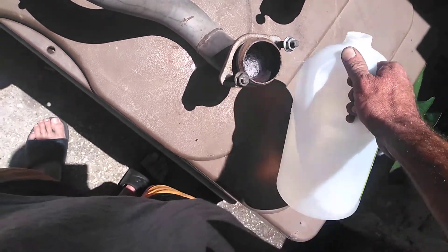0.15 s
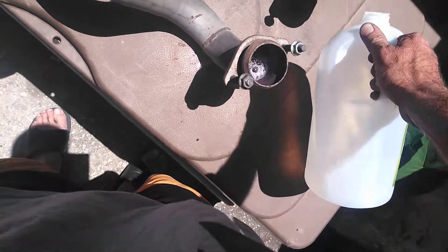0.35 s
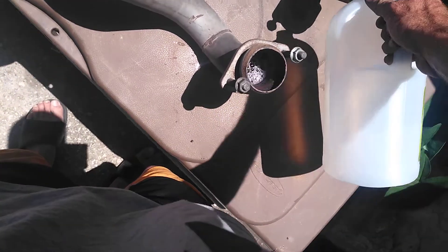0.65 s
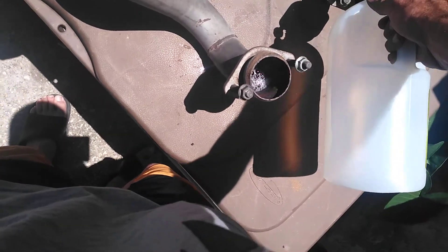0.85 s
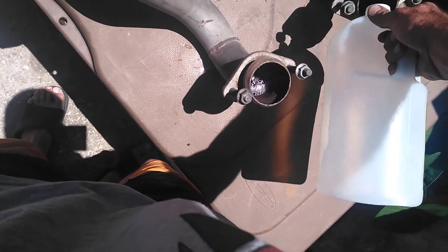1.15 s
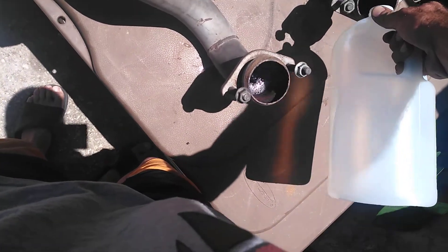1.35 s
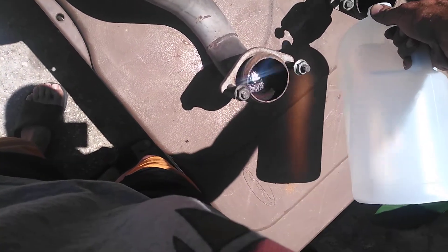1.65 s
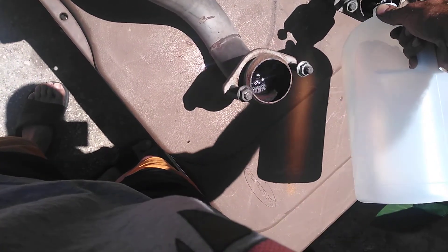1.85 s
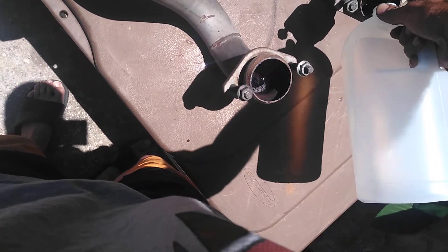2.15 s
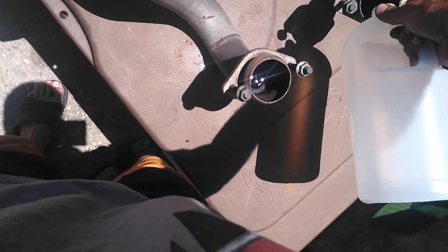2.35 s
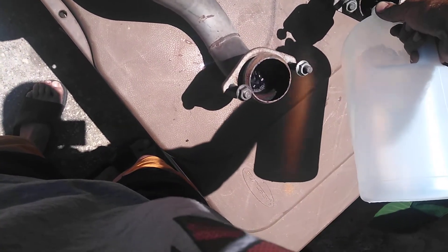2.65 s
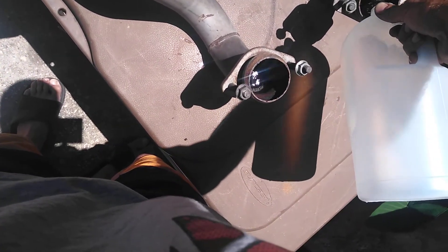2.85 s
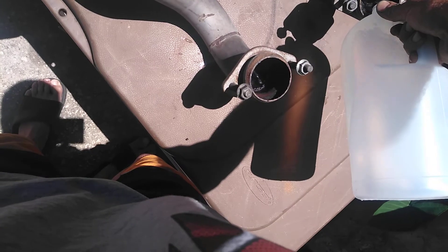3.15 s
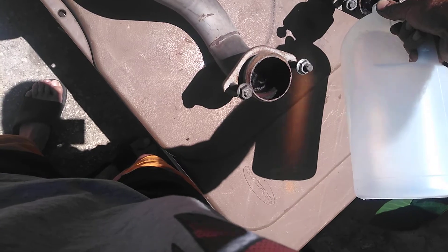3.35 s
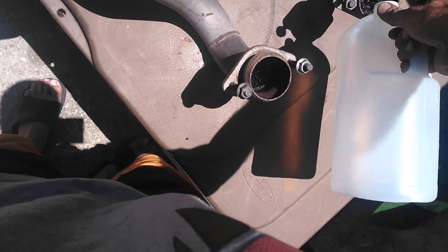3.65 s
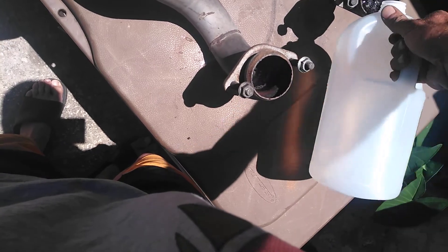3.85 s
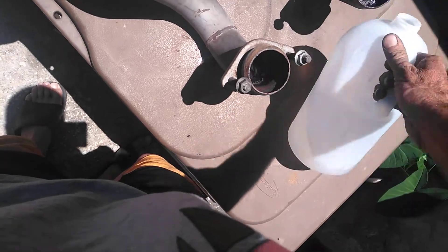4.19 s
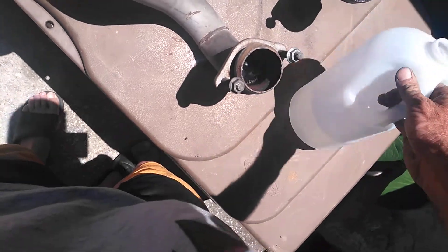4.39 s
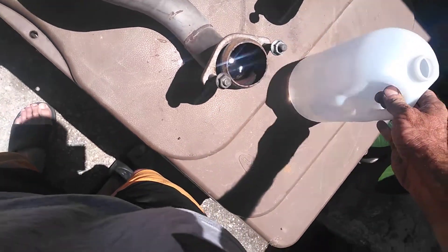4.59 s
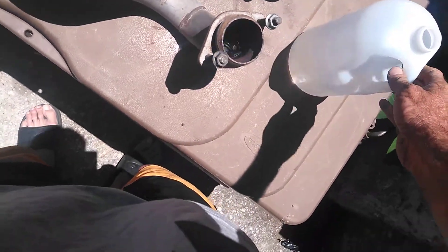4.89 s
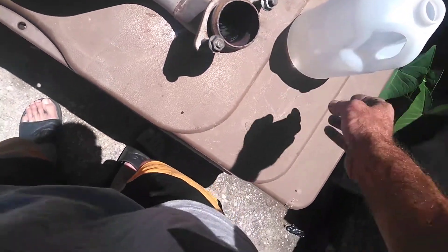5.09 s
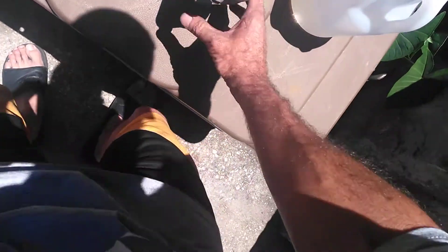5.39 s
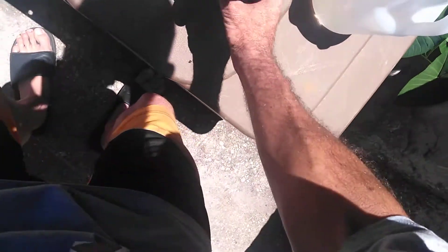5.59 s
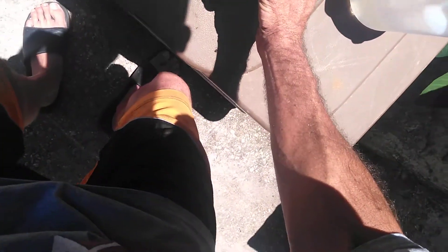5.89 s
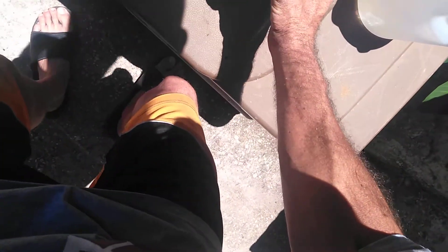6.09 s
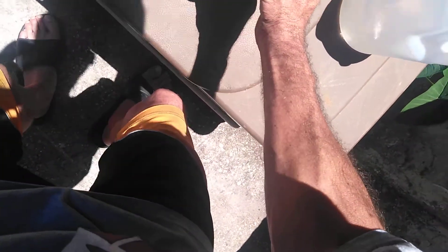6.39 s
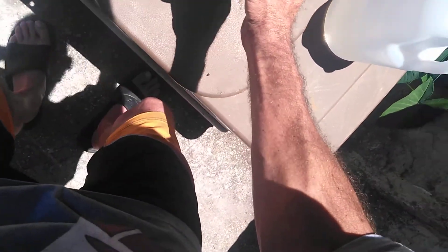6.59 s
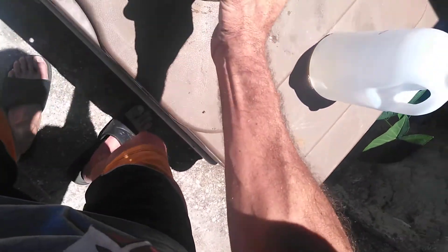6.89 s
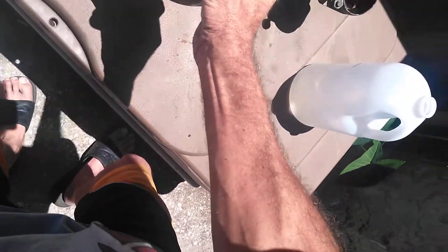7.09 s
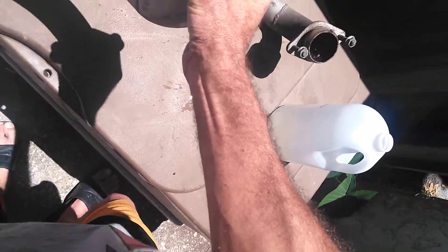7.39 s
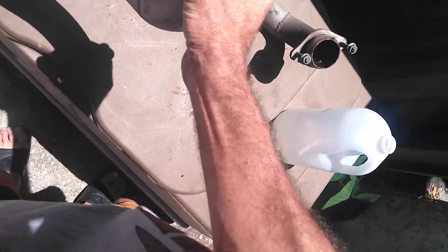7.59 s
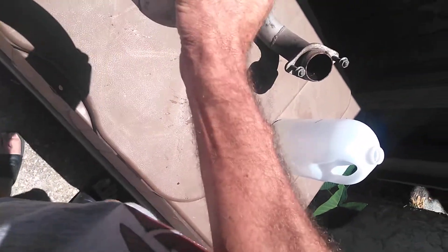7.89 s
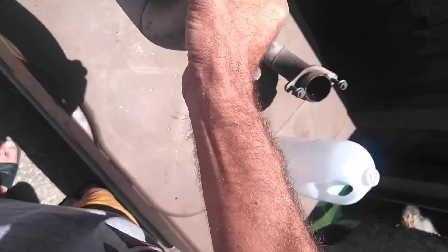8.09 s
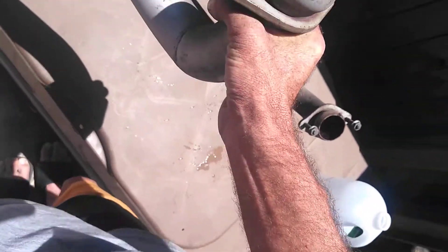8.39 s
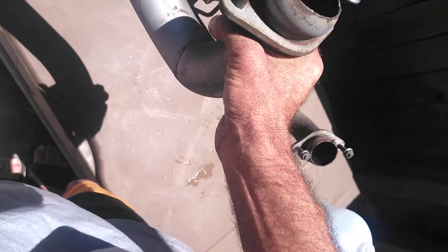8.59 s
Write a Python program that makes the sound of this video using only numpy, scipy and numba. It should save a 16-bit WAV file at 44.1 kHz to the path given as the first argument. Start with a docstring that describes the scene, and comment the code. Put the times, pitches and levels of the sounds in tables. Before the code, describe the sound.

Outdoors, close up: bright watery spatter in a metal pipe, a plastic jug set down and dragged, a dull muffler clunk, two rising gulps.

```python
"""Liquid sloshes and spatters inside a steel muffler, handled outdoors at a plastic table near the microphone.
Slaps throw damped-sine droplets, bubbles chirp upwards, filtered grains fizz and the pipe rings on with them.
Tipped, the muffler glugs with a rising sweep; it clunks on the table as a sum of decaying modes.
A plastic jug is set down and dragged by stick and slip, brushing and swishing are shaped noise,
and low pressure pulses thud at the microphone over quiet outdoor air."""
import sys
import numpy as np
from scipy import signal
from scipy.fft import rfft, irfft
from scipy.io import wavfile
from scipy.ndimage import uniform_filter1d
from numba import njit

SR = 44100
rng = np.random.default_rng(int(sys.argv[2]) if len(sys.argv) > 2 else 0)


def wav_out(sig):
    """Save sig, one row per channel (or a flat mono array), as 16-bit PCM at SR to the path in sys.argv[1]."""
    wavfile.write(sys.argv[1], SR, np.round(np.clip(np.atleast_2d(sig).T, -1, 1) * 32767).astype(np.int16))


N = 385413
TIME = np.arange(N) / SR
SHORT = TIME[:SR // 2]  # half a second, the span of one event

# Levels in all tables are relative, ahead of the gains of their source and its surroundings.
# liquid slapping the pipe wall: (time [s], level [dB], droplet pitch [Hz])
SLAPS = [(1.1464, -26, 4530), (1.173, -31.5, 2960), (1.219, -38.5, 6230), (1.414, -33, 4900),
         (1.486, -35, 3600), (1.514, -31, 4200), (1.5466, -13.5, 5400), (1.586, -20.5, 4530),
         (1.6576, -15, 4220), (1.731, -21, 6260), (1.7884, -14, 5640), (1.8072, -11, 4550),
         (1.8936, -24.5, 7100), (1.922, -23, 2900), (1.955, -28, 1830), (1.971, -27, 2140),
         (1.979, -12, 3000), (2.011, -24, 5480), (2.0673, -19, 7300), (2.0889, -18.5, 2300),
         (2.1091, -15.5, 4700), (2.1355, -21.5, 1840), (2.1794, -21.5, 5970), (2.2069, -28.5, 2370),
         (2.269, -34.5, 6050), (2.246, -34, 6570), (2.319, -32, 6800), (2.391, -15.5, 4300),
         (2.408, -26, 4230), (2.465, -34, 1720), (2.4897, -21, 4300), (2.58, -27.5, 5570),
         (2.6193, -20, 1730), (2.6442, -19.5, 6800), (2.689, -32, 5740), (2.806, -22, 5300),
         (2.848, -23.5, 5800), (2.8896, -25, 6200), (2.9475, -19, 5060), (2.9656, -28.5, 5100),
         (3.017, -26.5, 6160), (3.037, -23, 6840), (3.092, -16.5, 6140), (3.1323, -23.5, 5600),
         (3.256, -21.5, 5200), (3.28, -27.5, 3160), (3.314, -29, 4100), (3.365, -36, 5840),
         (3.4117, -36.5, 6530), (3.481, -25.5, 5250), (3.575, -28, 5970), (3.751, -38, 6300),
         (3.904, -41.5, 5000), (7.824, -33, 2050), (8.078, -39, 2400), (8.121, -24, 3000),
         (8.141, -32, 4200), (8.183, -21, 4800), (8.516, -35, 4440), (8.534, -49, 5900), (8.684, -32, 5500)]
# large bubbles in the pipe and the jug: (time [s], starting pitch [Hz], level [dB], t60 [s])
LARGE_BUBBLES = [(1.146, 590, -30, 0.045), (1.145, 1460, -30.5, 0.023), (1.171, 1520, -36, .03),
                 (1.246, 1490, -50.5, .04), (1.172, 462, -30.5, .13), (1.543, 928, -28.5, 0.099),
                 (1.547, 445, -32, .15), (1.552, 1077, -24, .07), (1.565, 1310, -26, 0.043),
                 (1.771, 1400, -31.5, .04), (1.655, 676, -33.5, 0.039), (1.658, 1330, -26.5, 0.016),
                 (1.724, 1420, -31.5, .015), (1.786, 472, -21.5, .12), (1.79, 320, -25.5, 0.073),
                 (1.807, 1540, -21.5, 0.027), (1.904, 1322, -27, 0.09), (1.959, 1400, -30.5, 0.06),
                 (1.981, 338, -40, 0.085), (1.9806, 1390, -4.5, 0.016), (1.982, 2100, -23.5, 0.025),
                 (1.984, 2750, -33, .089), (2.201, 2420, -32.5, 0.062), (2.028, 1590, -19.5, 0.031),
                 (2.068, 657, -39, .14), (2.084, 875, -31.5, 0.055), (2.092, 654, -35.5, .14),
                 (2.130, 624, -21, 0.069), (2.13, 1652, -28, 0.14), (2.279, 1330, -37, 0.04),
                 (2.338, 633, -39.5, 0.058), (2.370, 690, -36.5, 0.078), (2.395, 745, -26, .08),
                 (2.398, 369, -38, 0.16), (2.465, 1534, -18, 0.016), (2.617, 1230, -30, 0.03),
                 (2.618, 770, -33, 0.035), (2.640, 764, -17, 0.043), (2.804, 272, -48, 0.068),
                 (2.804, 1370, -43, 0.026), (2.871, 896, -37.5, .071), (3.082, 973, -30, 0.052),
                 (3.133, 279, -27, 0.031), (3.137, 1360, -19, 0.0088), (3.275, 1350, -36, .048),
                 (3.279, 3110, -27.5, 0.032), (2.91, 2290, -38, .035), (3.016, 1120, -44, .035),
                 (3.563, 1280, -44, 0.024), (1.875, 1500, -33, .03), (1.909, 1494, -25.5, .035),
                 (1.969, 1630, -20, 0.018), (2.05, 1710, -33, 0.027), (2.093, 1770, -31, .04),
                 (2.33, 1510, -37, .04), (2.984, 1400, -46, 0.028), (3.096, 1450, -36, .03),
                 (3.167, 1310, -43, .035), (3.217, 1420, -37, 0.035), (3.245, 1250, -37, 0.03),
                 (3.314, 1270, -38, .04), (3.482, 1390, -36, 0.03), (3.369, 1380, -33.5, 0.042),
                 (3.44, 1330, -39.5, 0.043), (3.536, 1460, -28.5, .027), (3.874, 1660, -38, 0.031),
                 (3.907, 1520, -25.5, 0.017), (4.326, 1410, -28, .03), (4.334, 1600, -26.5, 0.037),
                 (7.817, 520, -38, 0.076), (7.818, 2050, -44, 0.047), (7.836, 712, -20, 0.056),
                 (7.843, 755, -21.5, .05), (7.85, 936, -28.5, .06), (7.847, 5480, -28.5, 0.02),
                 (8.118, 1017, -33.5, .06), (8.18, 276, -17.5, 0.068), (8.179, 457, -21.5, .025),
                 (8.184, 633, -17, 0.03), (8.177, 1575, -26.5, 0.049), (8.191, 1780, -35, 0.066),
                 (8.329, 405, -21.5, 0.076), (8.331, 626, -29, 0.028)]
# strength of the flow in the pipe: (time [s], level [dB])
PIPE_FLOW = [(1.05, -78.5), (1.17, -55.5), (1.33, -78.5), (1.471, -66), (1.56, -53), (1.64, -57.5),
             (2.101, -49.5), (2.4, -51), (2.548, -59.5), (2.75, -60.5), (3.15, -60), (3.55, -66),
             (3.92, -82)]
FULL_FLOW_DB = -51.5


def amp(db):
    """Decibels to amplitude ratio."""
    return 10 ** (np.asarray(db) / 20)


def unit(x):
    """Normalisation to an rms of one."""
    return x / np.sqrt(np.mean(x ** 2))


def fade(t60):
    """Exponential decay by 60 dB in t60 [s]."""
    return amp(-60 * SHORT / max(t60, .003))


def swell(s, db):
    """Gain envelope: levels interpolated in decibels, lightly smoothed, silent outside the curve."""
    level_db = np.interp(TIME, s, db, left=-200, right=-200)
    return uniform_filter1d(amp(level_db), 256)


def stroke(start, attack, hold, release, db):
    """Gain envelope of a movement that swells, holds and fades over a range of 32 dB."""
    corners = start + np.cumsum([0, attack, hold, release])
    return swell(corners, db - 32 * np.array([1, 0, 0, 1]))


def add(out, s, sound):
    """Superposition of a sound at time s [s]."""
    i = max(int(s * SR), 0)
    out[i:i + len(sound)] += sound[:max(N - i, 0)]


def colour(x, points):
    """Minimum-phase filtering through (frequency [Hz], level [dB]) points, with unit power gain."""
    hz, db = np.transpose(points)
    size = 4096
    log_bins = np.log(np.fft.rfftfreq(size, 1 / SR) + 1)
    cepstrum = irfft(np.log(amp(np.interp(log_bins, np.log(hz), db))))
    # folding the cepstrum onto positive time makes the filter causal
    cepstrum[1:size // 2] *= 2
    cepstrum[size // 2 + 1:] = 0
    response = irfft(np.exp(rfft(cepstrum)))
    return signal.fftconvolve(x, response / np.linalg.norm(response))[:len(x)]


def walk(rate):
    """Slow random modulation: normal deviates, rate of them a second, joined by straight lines."""
    steps = rng.standard_normal(16384)
    return np.interp(TIME * rate, np.arange(len(steps)), steps)


@njit
def ring_grains(start, hz, cycles, size, rise):
    """Damped oscillation: each grain is a decaying sine whose pitch climbs by the share rise."""
    out = np.zeros(N)
    for k in range(len(start)):
        n = int(cycles[k] * SR / hz[k]) + 2
        for i in range(min(n, N - start[k])):
            u = i / n
            phase = 2 * np.pi * hz[k] * i / SR * (1 + rise * u / 2)
            out[start[k] + i] += size[k] * np.exp(-6 * u) * np.sin(phase)
    return out


def grains(low_hz, high_hz, cycles, spread_db, rise, count):
    """Granular texture: randomly timed rings with exponentially spread levels, evened to unit power."""
    when, pitch, length, size = rng.random((count, 4)).T
    hz = np.minimum(low_hz * (high_hz / low_hz) ** pitch, SR * .4)
    start = (when * N).astype(np.int64)
    # the root of the pitch gives short, high rings as much energy as low ones
    height = amp(-spread_db * np.log(1 - size)) * np.sqrt(hz)
    x = ring_grains(start, hz, cycles * (.5 + length), height, float(rise))
    return x / np.sqrt(np.abs(uniform_filter1d(x ** 2, size=1800)) + 1e-9)


def hiss(hz, width):
    """Resonant filtering of half a second of noise, by two equal peaks; width is a share of the pitch."""
    b, a = signal.iirpeak(min(hz, SR * .3), max(1 / width, hz / SR * 3), fs=SR)
    once = signal.lfilter(b, a, rng.standard_normal(len(SHORT)))
    twice = signal.lfilter(b, a, once)
    return unit(colour(twice, [(400, -8.0), (1500, -5), (6000, 0), (9000, -4), (15500, 5.0)]))


def body(modes):
    """Modal synthesis of a struck object; each blow lands on a slightly different spot."""
    chance = rng.standard_normal((len(modes), 2))
    ring = np.zeros(len(SHORT))
    for (hz, db, t60), (spot, side) in zip(modes, chance):
        gain = np.sign(side) * amp(db + 0.67 * spot)
        ring += gain * fade(t60) * np.sin(2 * np.pi * hz * SHORT)
    return ring / 2


def tick(db, t60):
    """Broadband impact noise: the bright crack of a contact."""
    crack = rng.standard_normal(len(SHORT)) * fade(t60)
    spectrum = [(200, -25), (1200, 11.5), (2200, 5.5), (3800, 5.0), (5800, 6.5), (9000, -11), (15000, -23.0)]
    return amp(db - 9) * colour(crack, spectrum)


def splashes(count=14):
    """Droplet impact: a slap hisses and throws damped rings, the first at once, later ones mostly weaker."""
    scatter_s = 0.0075  # time scale over which a slap's droplets land
    s, db, hz = np.transpose(SLAPS)[:, :, None]
    wait, pitch, length, size = rng.random((len(s), count, 4)).transpose(2, 0, 1)
    late = -np.log(1 - wait) * np.linspace(0, 2.2, count)
    size = amp(4.5 * size - 2.2 * late)
    cycles = 100 * length ** 2 + 10  # most are brief ticks, a few ring
    # each cluster is scaled as a whole, whatever its random sizes
    cluster = np.linalg.norm(size * np.sqrt(cycles), axis=1, keepdims=True)
    size *= amp(db + 13) * np.sqrt(hz / 5000) / cluster
    hz = np.clip(hz * 2 ** (1.45 * (pitch - .5)), 500, SR * .4)
    start = ((s + scatter_s * late) * SR).astype(np.int64)
    out = ring_grains(start.ravel(), hz.ravel(), cycles.ravel(), size.ravel(), 0.087)
    for s, db, hz in SLAPS:
        decay = fade(0.014) + amp(-12.5) * fade(7 * scatter_s)
        add(out, s, amp(db - 0.5) * hiss(hz, width=0.51) * decay * (1 - fade(0.0086)))
    return out


def liquid():
    """Granular turbulence: spray and beads of air over a gurgle, following the flow and surging at slaps."""
    # (frequency [Hz], level [dB])
    spray_colour = [(800, -22.5), (1500, -15.5), (2800, -15), (4000, -6.5), (5500, 3.5), (7500, -4.5),
                    (11000, -7.5), (15500, -9)]
    # (frequency [Hz], level [dB])
    gurgle_colour = [(200, -11.5), (330, -3.5), (400, -23), (490, -17.5), (570, -3), (700, -3), (950, -9),
                     (1400, 6.5), (2000, 0), (3000, -3.5), (5000, -36)]
    s, flow_db = np.transpose(PIPE_FLOW)
    # from its level at full flow the gurgle changes by 3.3 dB per dB of flow
    gurgle_db = -59.5 + 3.3 * (flow_db - FULL_FLOW_DB)
    surge, t = np.zeros(N), SHORT - SHORT.mean()
    rise_s, fall_s = 0.0061, 0.0085  # the wave builds just before it breaks
    for at, db, _ in SLAPS:
        add(surge, at + t[0], amp(db) * np.exp(np.minimum(t / rise_s, -t / fall_s)))
    mist = grains(2000, 18000, cycles=8, spread_db=5.0, rise=.1, count=26000)
    beads = grains(2000, 12000, cycles=45, spread_db=3.8, rise=.06, count=11000)
    froth = grains(280, 3500, cycles=18, spread_db=4, rise=.12, count=7000)
    spray = colour(amp(-4.0) * mist + amp(4.5) * beads, spray_colour)
    gurgle = colour(froth, gurgle_colour)
    spray_gain = swell(s, flow_db) + amp(-22) * surge
    gurgle_gain = swell(s, gurgle_db) + amp(-25) * surge
    return spray_gain * spray + gurgle_gain * gurgle


def snaps():
    """Impulsive rupture: a film of liquid snaps against the steel with one dry crack."""
    # bursting films: (time [s], peak level [dB], pitch [Hz])
    films = [(1.4885, -28, 4000), (2.58, -31, 5600), (1.6565, -14, 3660), (1.8057, -16.5, 4300),
             (1.9808, -10, 1560), (1.9812, -19.5, 5200), (2.0298, -12.5, 8100), (2.4652, -26.5, 2200),
             (2.8205, -25.5, 4300), (2.9452, -14.5, 3550), (3.0906, -17, 6000), (3.4775, -15, 4850),
             (8.182, -19.5, 5000), (8.5155, -29, 3500)]
    out = np.zeros(N)
    for s, db, hz in films:
        crack = hiss(hz, width=1.1) * fade(.009)
        add(out, s, amp(db) * crack / np.abs(crack).max())
    return out


def bubbles():
    """Bubble resonance: a decaying, unsteady tone climbs in pitch as the bubble nears the surface."""
    out = np.zeros(N)
    for s, hz, db, t60 in LARGE_BUBBLES:
        waver = 1 + .05 * np.interp(SHORT * 300, np.arange(200), rng.standard_normal(200))
        pitch = hz * (1 + .2 * np.minimum(SHORT / t60, 1)) * waver
        envelope = fade(t60) * (1 - fade(.3 * t60))
        add(out, s, amp(db + 5.5) * envelope * np.sin(2 * np.pi * np.cumsum(pitch) / SR))
    return out


def followers(count=4):
    """Bubble resonance: a few fainter chirps follow each listed bubble, pitched somewhat lower or higher."""
    s, hz, db, t60 = np.repeat(LARGE_BUBBLES, count, axis=0).T
    wait, pitch, length = rng.random((len(s), 3)).T
    start = ((s + np.minimum(0.025, t60) * wait) * SR).astype(np.int64)  # within 25 ms, or t60 if shorter
    size = amp(db - 10.5 - 6 * wait)
    return ring_grains(start, hz * 2 ** (.9 * (pitch - .45)), 8 + 24 * length, size, 0.19)


def drips(count=240):
    """Random arrivals of ringing drips around one pitch, denser and louder while the flow is strong."""
    s, flow_db = np.transpose(PIPE_FLOW)
    vigour = swell(s, flow_db - FULL_FLOW_DB)
    when, pitch, length, size = rng.random((count, 4)).T
    # inverting the running total makes arrivals as dense as the flow is strong
    start = np.searchsorted(np.cumsum(vigour) / np.sum(vigour), when)
    hz = 1514 * 2 ** (1.1 * (pitch - .5))
    return ring_grains(start, hz, 15 + 40 * length, vigour[start] * amp(-47.5 + 4 * (size + 1.0)), .25)


def pipe(x):
    """Modal resonance: the steel pipe rings on at its own pitches after whatever sounds inside it."""
    # ring of the pipe under the liquid: (frequency [Hz], level [dB], t60 [s])
    pipe_modes = [(664, -13, .09), (726, -14.5, 0.083), (1240, -5.5, 0.13), (1800, -11.5, .12),
                  (2130, -10, .09), (2204, 0.5, 0.15), (2650, -7, 0.16), (4140, -4, 0.21),
                  (5685, -3.5, .06)]
    ring = np.zeros(len(SHORT))
    for hz, db, t60 in pipe_modes:
        # dividing by the sum sets the gain at resonance, whatever the decay
        ring += 2 * amp(db) * fade(t60) / fade(t60).sum() * np.cos(2 * np.pi * hz * SHORT)
    return amp(-6.17) * (x + signal.fftconvolve(x, ring)[:N])


def gulps():
    """Frequency sweep of an air pocket past a baffle: an S-shaped rise, steadiest midway, froth in its wake."""
    # gulps of air: (time at mid-sweep [s], level [dB], opening time constant [s], final pitch [Hz])
    air_pockets = [(7.719, -23.5, 0.0253, 551), (8.061, -18.5, 0.0216, 541)]
    low_hz = 100.7
    out, wake, t = np.zeros(N), np.zeros(N), SHORT - SHORT.mean()
    burst = np.exp(-(t / .021) ** 2)
    for s, db, opening, top_hz in air_pockets:
        flutter, waver = walk(120)[:len(t)], walk(164)[:len(t)]
        skirt = amp(-17 + 6.2 * flutter) * np.exp(-(t / 0.077) ** 2)
        loudness = burst + skirt
        sweep = low_hz + (top_hz - low_hz) / (1 + np.exp(-t / opening))
        hz = sweep * (1 + 0.073 * waver * (1 - burst))
        tone = np.sin(2 * np.pi * np.cumsum(hz) / SR)
        add(out, s + t[0], amp(db) * loudness / loudness.max() * tone)
        add(wake, s + t[0] + .04, amp(db - 33.5) * np.exp(-(t / 0.047) ** 2))  # 40 ms late
    return out + wake * grains(290, 1100, cycles=12, spread_db=-3.5, rise=.2, count=4000)


def trickle():
    """Granular texture: beads of air fizz in the liquid as it runs along the tipped steel."""
    # strength of the trickle: (time [s], level [dB])
    trickle_flow = [(8.03, -93), (8.055, -49), (8.1, -62), (8.14, -57), (8.17, -53), (8.24, -48.5),
                    (8.31, -56.5), (8.37, -62.5), (8.42, -52), (8.48, -81), (8.53, -51), (8.61, -67)]
    beads = grains(3200, 8000, cycles=40, spread_db=3.2, rise=.06, count=14000)
    return beads * swell(*np.transpose(trickle_flow))


def muffler():
    """Impact excitation: modes and a noisy table rattle, smoothed by a push; longer contact is duller."""
    # blows on the table: (time [s], level [dB], tick level [dB], contact time [ms], four times the push's rise)
    blows = [(6.090, -16.5, -18.5, 0.18), (6.097, -18.5, -19.5, 0.24), (6.112, -17.5, -48, 0.64),
             (6.157, -29, -40.5, 1.4), (6.323, -29, -45.5, 1.2), (6.333, -28.5, -47, 1.3),
             (6.343, -10, -45, 3.9)]
    # ring of the shell: (frequency [Hz], level [dB], t60 [s])
    shell_modes = [(145.8, -14.5, 0.39), (236, 1.5, 0.16), (385, -15, 0.28), (462, -3, 0.11),
                   (545, 0, 0.11), (589, 3.5, 0.091), (635, 2.5, 0.063), (921, -4.5, 0.11),
                   (1040, -18, 0.038), (1057, -1.5, 0.11), (1130, 0.5, 0.075), (1360, -9, 0.18),
                   (1360, -13, 0.07), (1546, -23, 0.1), (1800, -30.5, .1), (1940, -25, .09),
                   (2335, -24, 0.12), (2710, -23, 0.059)]
    rattle_colour = [(100, -9.0), (300, -10), (560, -6), (800, -5), (1100, -3.5), (1400, -10),
                     (1800, -23), (4000, -30.0)]
    out = np.zeros(N)
    for s, db, tick_db, contact_ms in blows:
        push = SHORT * np.exp(-SHORT * 4000 / max(contact_ms, .05))
        rattle = colour(rng.standard_normal(len(SHORT)) * fade(0.15), rattle_colour)
        ring = body(shell_modes) + amp(-6.0) * rattle
        blow = signal.fftconvolve(ring, push / push.sum())[:len(SHORT)]
        add(out, s, amp(db) * blow + tick(tick_db, t60=0.089))
    return out


def jug():
    """Impact and stick-slip friction: a hollow modal knock, then slips and a grainy scrape with slop."""
    # the jug meeting the table: (time [s], level [dB], tick level [dB])
    landings = [(4.194, -12, -27.5), (4.236, -29, -38), (4.268, -54, -42), (4.305, -31, -32.5),
                (4.7, -31, -39.5), (4.741, -38, -45), (4.787, -54, -58)]
    # ring of the jug: (frequency [Hz], level [dB], t60 [s])
    jug_modes = [(258, -16, 0.26), (349, 2.5, 0.078), (472, 5.5, 0.013), (563, -14, 0.1),
                 (636, -4.5, 0.058), (880, -24, 0.089), (1445, -24, 0.11), (1946, -12.5, 0.026)]
    # the base catching and slipping on the table: (time [s], level [dB])
    catches = [(4.332, -44), (4.36, -36), (4.394, -27), (4.406, -20.5), (4.415, -20.5), (4.423, -19),
               (4.433, -25.5), (4.443, -19.5), (4.462, -23), (4.483, -38), (4.502, -49)]
    # ring of the table: (frequency [Hz], level [dB], t60 [s])
    table_modes = [(315, -7, 0.039), (530, -8, 0.045), (643, 0, 0.078), (730, -4.5, 0.031),
                   (1028, -13, .05), (1230, -9.5, 0.046), (1450, -13.5, 0.046), (1920, -16, 0.022)]
    # grind of the dragged jug: (time [s], level [dB])
    drag = [(4.32, -48), (4.345, -45), (4.38, -41.5), (4.41, -38.5), (4.465, -36), (4.5, -41), (4.53, -57),
            (4.57, -46.5), (4.64, -68)]
    # (frequency [Hz], level [dB])
    drag_colour = [(120, -9), (200, -4), (312, -2), (415, -10), (461, -3), (504, -10), (646, -12.5),
                   (875, -18), (1140, -29), (1250, -8), (2020, -10.5), (3500, -10), (6290, -21),
                   (14000, -39)]
    out = np.zeros(N)
    for s, db, tick_db in landings:
        add(out, s, amp(db) * body(jug_modes) + tick(tick_db, t60=0.12))
    for s, db in catches:
        add(out, s, amp(db) * body(table_modes) + tick(db - 21, t60=.02))
    grit = grains(237, 9300, cycles=5, spread_db=3.2, rise=0, count=32000)
    slop = grains(400, 2600, cycles=22, spread_db=4, rise=.05, count=3000)
    scrape = unit(colour(grit + slop / 2, drag_colour)) * amp(2.7 * walk(90))
    return out + scrape * swell(*np.transpose(drag))


def booms():
    """Flexural resonance: the plastic table top gives short, hollow, decaying tones."""
    # booms of the table top: (time [s], level [dB], pitch [Hz], t60 [s])
    flexes = [(4.198, -22, 111.5, 0.14), (4.443, -20, 127, 0.15), (4.5, -14.5, 116.5, 0.13),
              (4.703, -28.5, 138, 0.23), (4.751, -26, 148, 0.17), (6.095, -24, 115, 0.32)]
    out = np.zeros(N)
    for s, db, hz, t60 in flexes:
        add(out, s, amp(db) * fade(t60) * (1 - fade(0.0085)) * np.sin(2 * np.pi * hz * SHORT))
    return out


def surroundings(x, wet_db, t60):
    """Convolution reverberation: a short scatter from the steel shell, the table and nearby walls."""
    tail = rng.standard_normal(len(SHORT)) * fade(t60) * (1 - fade(0.013))
    tail = colour(tail, [(100, -4.5), (500, -0.5), (2500, -5.0), (5500, -1.0), (14000, 4.5)])
    return x + amp(wet_db) * signal.fftconvolve(x, tail / np.linalg.norm(tail))[:N]


def thuds():
    """Pressure pulses at the microphone: a windowed low cosine each, higher if shorter, with some rumble."""
    # low thuds: (time of envelope peak [s], level [dB], length at half height [s])
    buffets = [(0.19, -23, 0.022), (0.256, -26.5, 0.032), (0.327, -39.5, .019), (0.689, -32, 0.029),
               (0.796, -31.5, .017), (1.004, -37, 0.021), (1.19, -40, .019), (1.283, -29, 0.0072),
               (1.367, -39, 0.012), (1.656, -23.5, 0.014), (1.957, -48, 0.015), (2.241, -28, 0.022),
               (2.312, -24, .016), (2.409, -27.5, 0.038), (2.441, -27.5, 0.0091), (2.605, -30.5, 0.012),
               (2.874, -34, 0.025), (3.817, -37.5, 0.016), (4.212, -19, 0.015), (4.249, -30, .018),
               (4.322, -27.5, 0.013), (4.459, -19.5, 0.0069), (4.503, -18, 0.016), (4.607, -18.5, 0.013),
               (4.706, -19.5, .008), (4.883, -38, 0.03), (5.094, -19.5, 0.029), (5.268, -32.5, 0.03),
               (5.386, -28, 0.012), (5.437, -39, 0.011), (5.481, -22, .02), (6.09, -27, 0.027),
               (6.178, -25.5, 0.017), (6.268, -29, 0.035), (6.354, -17, 0.0081), (6.822, -36, 0.032),
               (6.983, -36, 0.011), (7.133, -38, 0.045), (7.438, -27, 0.021), (7.499, -24, 0.051),
               (7.554, -17, .033), (8.134, -29.5, 0.014), (8.449, -22, 0.046), (8.502, -17.5, 0.014),
               (8.593, -23, 0.027)]
    out, shake = np.zeros((2, N))
    for s, db, length in buffets:
        hz = 75.3 * (0.019 / length) ** .42  # 75.3 Hz at a length of 19 ms
        lead = min(s, 2 * length)
        t = SHORT - lead
        envelope = np.exp(-np.log(16) * (t / length) ** 2)
        add(out, s - lead, amp(db) * envelope * np.cos(2 * np.pi * (hz * t + rng.random())))
        add(shake, s - length / 2, amp(db) * fade(0.24) * (1 - fade(0.017)))
    rumble_colour = [(22, -24.0), (48, 5.5), (110, 3), (200, -12), (400, -46.5), (1200, -67)]
    rumble = colour(rng.standard_normal(N), rumble_colour)
    return out + amp(-8) * shake * rumble


def brushes():
    """Flow and friction noise: each brush or swish is a fine, grainy hiss that swells and dies away."""
    # brushing and swishing hiss: first wash in the pipe, dragged jug, hands, late swishes in the muffler:
    # (time [s], level [dB], pitch [Hz], rise time constant [s], t60 [s])
    swishes = [(0.597, -55.5, 5800, 0.0045, .089), (1.107, -43, 5760, 0.0086, 0.19),
               (1.14, -43.5, 6200, 0.024, .42), (4.204, -51, 5600, .011, 0.49),
               (4.266, -41, 5700, .0024, 0.15), (4.307, -41, 6250, .009, .35),
               (4.308, -34, 2570, 0.015, 0.14), (4.384, -37, 5540, 0.019, 0.24),
               (4.459, -40, 5600, 0.02, 0.35), (4.553, -47.5, 6200, 0.0019, 0.25),
               (4.46, -40, 3000, .012, 0.13), (4.598, -48, 1950, .005, 0.075),
               (6.04, -38, 4200, 0.0077, 0.098), (7.12, -54, 6600, .0013, .15),
               (7.483, -35, 6000, .0007, 0.031), (7.49, -54, 7000, 0.0057, 0.25),
               (7.816, -61, 2050, 0.0087, 0.093), (8.046, -48, 5200, 0.0037, 0.35),
               (8.118, -32.5, 2860, 0.0027, 0.079), (8.196, -27.5, 5300, 0.059, 0.24),
               (8.4, -38.5, 5720, 0.0098, 0.23), (8.404, -36, 2200, 0.021, .1),
               (8.514, -38, 4200, 0.0034, 0.077), (8.682, -41.5, 5300, 0.0053, 0.19)]
    out = np.zeros(N)
    for s, db, hz, rise, t60 in swishes:
        add(out, s, amp(db) * hiss(hz, width=0.7) * fade(t60) * (1 - fade(7 * rise)))
    return out * amp(1.8 * walk(250) + 2.6 * walk(1400) - 1)


def rubs():
    """Friction noise in one band: skin and cloth slide over table and shell with a dull, uneven hiss."""
    # slow rubs: (start [s], attack [s], hold [s], release [s], level [dB], pitch [Hz])
    slow_slides = [(4.68, 0.037, 0.075, 0.1, -42, 160), (4.827, 0.053, .025, 0.045, -60.5, 2200),
                   (5.3, 0.3, .3, .15, -67, 820), (6.661, 0.11, .1, 0.55, -59, 396),
                   (6.775, .08, 0.057, 0.75, -70, 2030), (6.9, .4, .7, .2, -73.5, 2040),
                   (8.386, 0.042, 0.08, 0.094, -44.5, 238)]
    out = np.zeros(N)
    for *movement, hz in slow_slides:
        sos = signal.butter(2, [hz / 1.43, hz * 1.27], "band", fs=SR, output="sos")
        band = signal.sosfilt(sos, rng.standard_normal(N))
        out += unit(band) * stroke(*movement)
    return out * amp(5.9 * walk(45) + 1.8 * walk(500))


def rustle():
    """Friction noise: cloth slides over cloth with a fine, uneven hiss."""
    # hand and clothes brushing: (start [s], attack [s], hold [s], release [s], level [dB])
    movements = [(4.497, 0.056, 0.13, 0.12, -66.5), (4.829, .06, 0.066, 0.17, -60.5),
                 (4.912, 0.029, 0.0076, 0.02, -51.5), (5.16, 0.047, .03, 0.11, -63.5),
                 (5.272, 0.056, .02, 0.086, -62), (5.356, 0.059, 0.083, 0.19, -58.5),
                 (5.513, 0.047, 0.072, 0.071, -64), (5.613, 0.037, 0.05, 0.12, -58.5)]
    # (frequency [Hz], level [dB])
    rustle_colour = [(1500, -13.5), (2800, -7.5), (4000, -5), (4500, 3), (4900, -5), (5300, 6),
                     (5900, -0.5), (6300, -10), (7500, -13), (8200, -20.5), (15000, -33.5)]
    noise = unit(colour(rng.standard_normal(N), rustle_colour))
    return noise * sum(stroke(*row) for row in movements) * amp(1.1 * walk(88))


def yard():
    """Stationary ambient noise: quiet outdoor air, wavering a little."""
    # (frequency [Hz], level [dB])
    air_colour = [(15, -49), (25, -7), (45, 0), (75, 2.5), (305, -14), (537, -15.5), (631, -13),
                  (919, -18.5), (1380, -28.5), (2120, -33.5), (3720, -35.5), (5580, -30), (7300, -41.5),
                  (11500, -45), (13500, -79.5), (15500, -66)]
    return unit(colour(rng.standard_normal(N), air_colour)) * amp(-56.5 + 0.87 * walk(4.0))


def scene():
    """Superposition of all sources at one microphone."""
    inside = liquid() + splashes() + snaps() + bubbles() + followers() + drips()
    wet = surroundings(pipe(inside), wet_db=-8.0, t60=.22)
    solid = surroundings(jug() + muffler() + booms() + gulps(), wet_db=-14, t60=0.37)
    return (wet + solid + trickle() + thuds() + rustle() + rubs() + brushes() + yard())[None]


def record(dry):
    """Band limiting: the microphone sheds the deepest bass and the recorder cuts the top."""
    dry = signal.sosfilt(signal.butter(3, 30, "high", fs=SR, output="sos"), dry)
    return signal.sosfilt(signal.ellip(8, .2, 80, 15900, fs=SR, output="sos"), dry)


dry = scene()
out = record(dry)
wav_out(out)
```